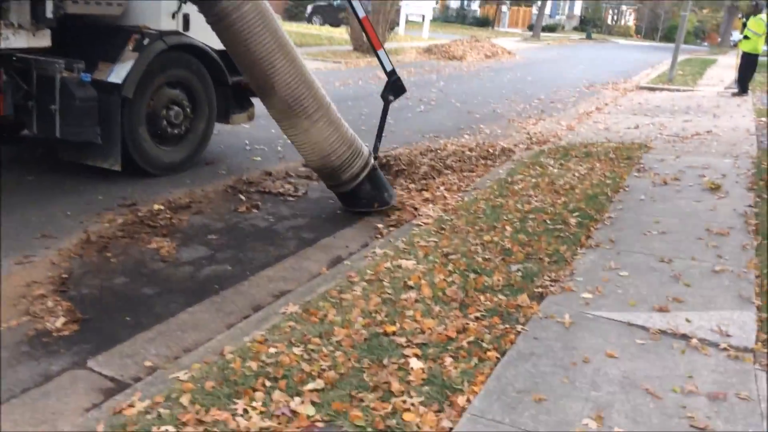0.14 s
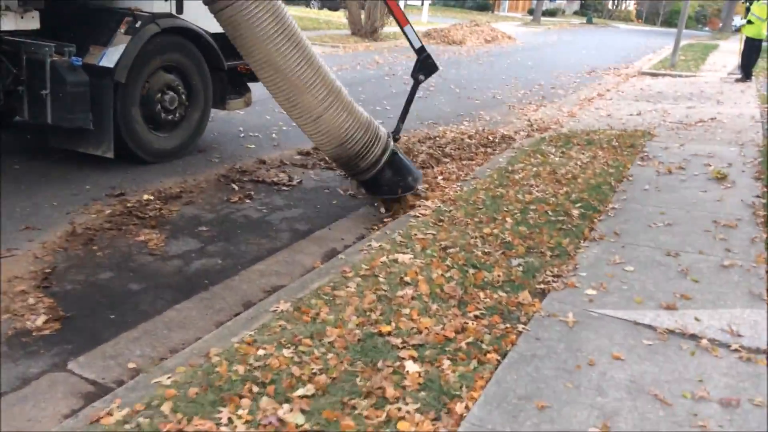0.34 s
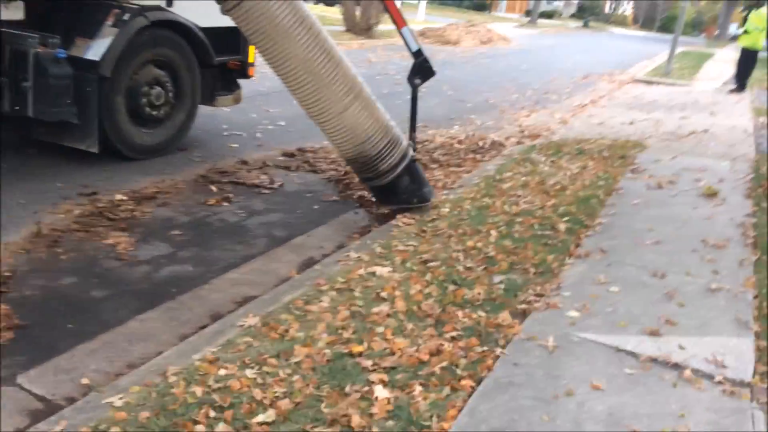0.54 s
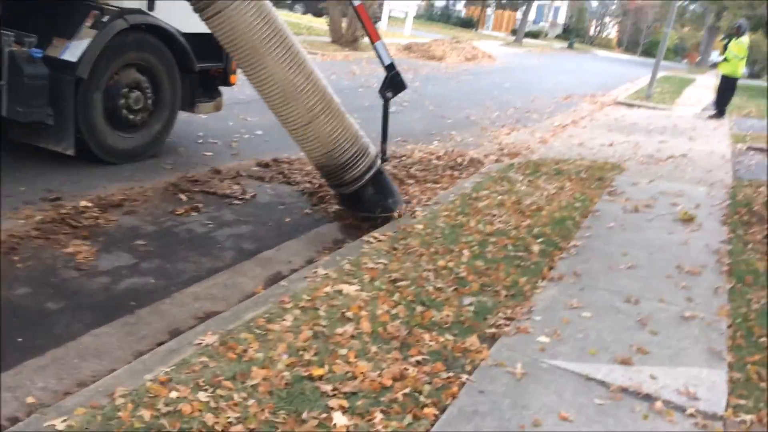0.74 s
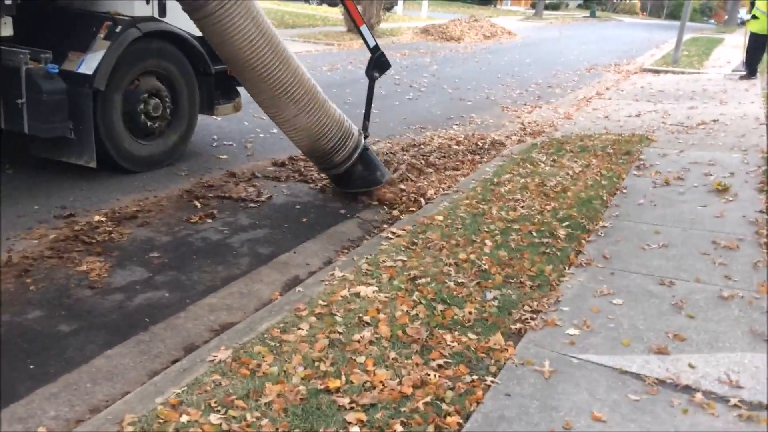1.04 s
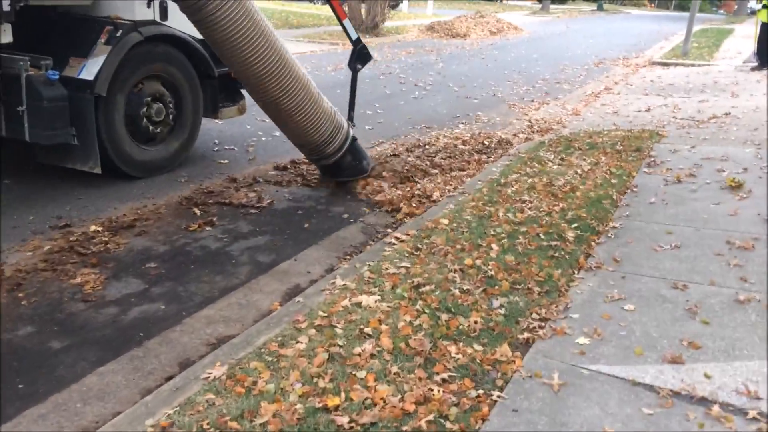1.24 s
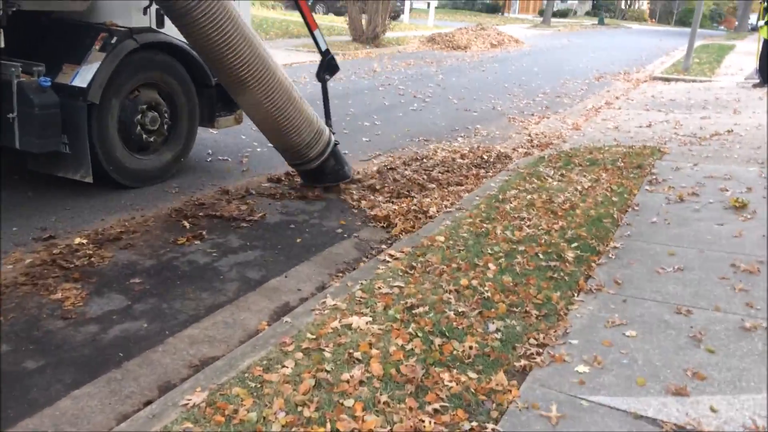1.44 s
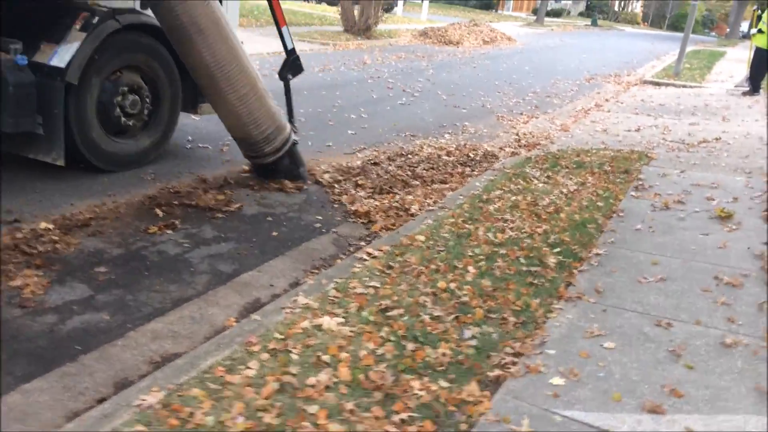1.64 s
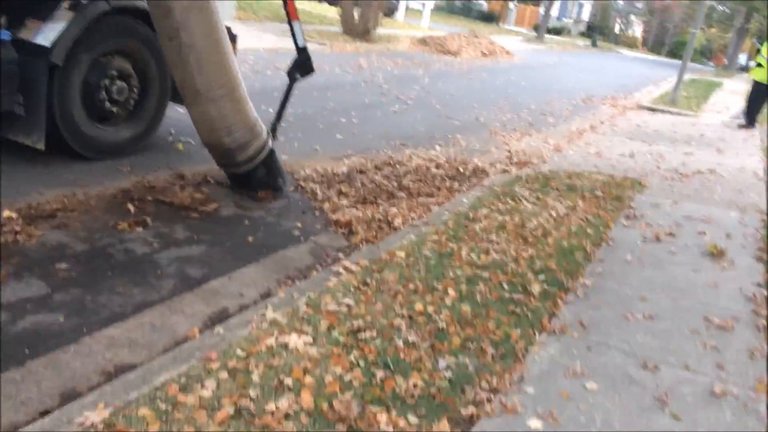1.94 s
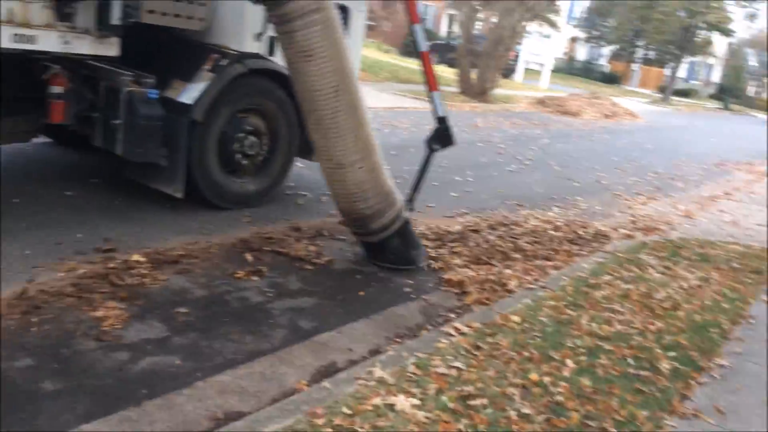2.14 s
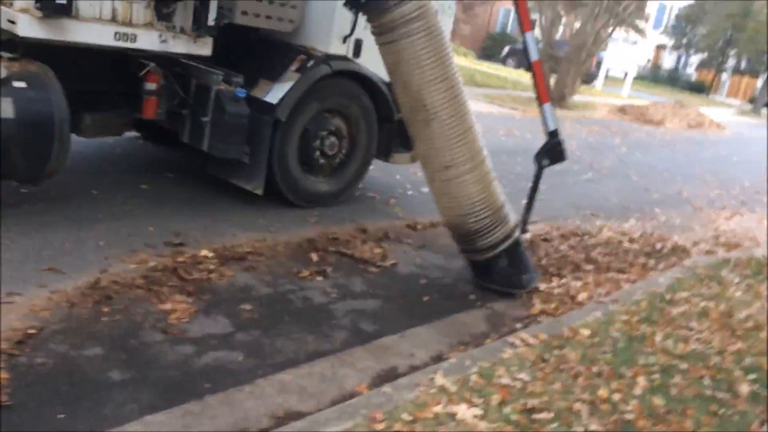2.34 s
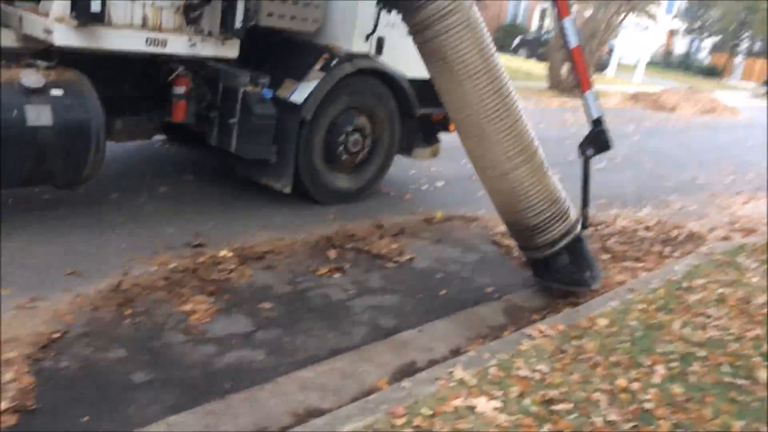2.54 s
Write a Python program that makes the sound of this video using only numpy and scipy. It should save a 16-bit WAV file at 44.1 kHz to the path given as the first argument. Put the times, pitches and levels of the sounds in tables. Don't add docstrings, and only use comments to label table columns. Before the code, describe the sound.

Heard from the pavement with one handheld microphone, a leaf-suction truck hums and roars without pause, its airflow gulping unevenly; leaves hiss up the hose, debris cracks, a high brake squeal passes, treble slightly choppy.

```python
import sys
import numpy as np
from scipy import signal
from scipy.fft import rfft, irfft
from scipy.io import wavfile
from scipy.ndimage import uniform_filter1d

SR = 44100
rng = np.random.default_rng(int(sys.argv[2]) if len(sys.argv) > 2 else 0)


def voltage_ratio(level):
    return 10 ** (np.asarray(level, float) / 20)


def to_wav(s):
    ch = np.atleast_2d(s).T
    pcm = np.round(np.clip(ch, -1, 1) * 32767)
    wavfile.write(sys.argv[1], SR, pcm.astype(np.int16))


N = 119070
TIME_S = np.arange(N) / SR
BIN_HZ = np.arange(N // 2 + 1) * SR / N

# start_s, roar_gain_db
AIR_GULP = [(0, 0.5), (.14, -1.5), (.2, 2.5), (.33, -1), (.4, -3), (.62, 1.5), (.72, -2.5), (.88, -0.5),
            (1.2, -4), (1.6, 1), (1.72, 1.5), (1.8, -1.5), (1.88, 0), (2.05, -1), (2.13, 2.5), (2.33, 0.5),
            (2.42, -1.5), (2.7, -3)]
TONE_FLUTTER_DB = 2


def level(x, db):
    return x * voltage_ratio(db) / np.sqrt(np.mean(x ** 2))


def curve(table, col):
    rows = np.array(table, float)
    return np.interp(TIME_S, rows[:, 0], rows[:, col])


def band(x, hz, width):
    return signal.lfilter(*signal.iirpeak(min(hz, .45 * SR), hz / max(width, 1), SR), x)


def walk(rate):
    hold = int(SR / rate)
    steps = np.repeat(rng.standard_normal(N // hold + 1), hold)
    return 1.42 * uniform_filter1d(uniform_filter1d(steps, hold), hold)[:N]


def colour(x, points):
    rows = np.array(points, float)
    gain_db = np.interp(np.log(np.maximum(BIN_HZ, 1)), np.log(rows[:, 0]), rows[:, 1])
    return irfft(rfft(x) * voltage_ratio(gain_db), N)


def tone(hz, db):
    return np.sqrt(2) * voltage_ratio(db) * np.sin(2 * np.pi * np.cumsum(hz) / SR)


def hum():
    # start_s, firing_hz, first_order_db, second_order_db
    engine = [(0, 62.4, -30, -36), (.2, 62.4, -30, -29), (.26, 62.7, -25, -23), (.44, 62.4, -30, -26),
              (.5, 61.9, -29, -39), (.58, 63.1, -22, -23), (.75, 62.3, -27, -29), (.9, 62.13, -26, -21),
              (1.1, 62.25, -33, -25.5), (1.3, 62.73, -24, -23), (1.4, 62.34, -31, -21.5),
              (1.66, 62.6, -28, -18.5), (1.74, 62.4, -31, -21), (1.9, 62.34, -34, -19),
              (2.3, 62.54, -29, -22.5), (2.7, 61.92, -28, -19)]
    # start_s, blade_pass_hz, level_db
    blades = [(0, 186, -21), (.14, 188.6, -12.5), (.2, 187, -22.5), (.38, 185, -26.5), (.47, 187.4, -15),
              (.52, 185.8, -20), (.63, 186.1, -12), (.78, 184.7, -17), (.9, 185.1, -12),
              (1.1, 184.9, -16.5), (1.25, 186.9, -16), (1.4, 186, -29), (1.52, 186.2, -21),
              (1.66, 186.5, -17), (1.73, 186.2, -24.5), (1.8, 187, -21), (1.9, 188.2, -24),
              (2.15, 188, -20.5), (2.26, 187.5, -25.5), (2.55, 187.3, -16), (2.7, 187.2, -23.5)]
    octave_db = -17

    def fluttering_tone(hz, db):
        return tone(hz, db + TONE_FLUTTER_DB * walk(18))

    fire_hz, blade_hz, blade_db = curve(engine, 1), curve(blades, 1), curve(blades, 2)
    firing = fluttering_tone(fire_hz, curve(engine, 2)) + fluttering_tone(2 * fire_hz, curve(engine, 3))
    throb = fluttering_tone(blade_hz, blade_db) + fluttering_tone(2 * blade_hz, blade_db + octave_db)
    return firing + throb


def hose():
    # pitch_hz, width_hz, level_db
    resonances = [(166.1, 38, -23), (212.5, 30, -33.5), (341.7, 22, -39.5), (535.6, 30, -39),
                  (1063, 240, -37), (91.4, 21, -37)]
    lump_db, gulp_share = 3, 0.16
    out = 0
    for hz, width, db in resonances:
        swell = voltage_ratio(gulp_share * curve(AIR_GULP, 1) + lump_db * walk(7))
        ringing = band(band(rng.standard_normal(N), hz, width), hz, width)
        out = out + swell * level(ringing, db)
    return out


def roar():
    # pitch_hz, density_db_per_hz
    air_colour = [(15, -41), (25, -16.5), (180, -5.5), (309, -11), (1070, -20), (2910, -25.5), (7110, -31),
                  (12900, -43.5), (16000, -65)]
    roar_db, lump_db = -21, 2.0
    out = 0
    for hz in 30 * 2. ** np.arange(0, 9.5, .5):
        gulp_share = min(hz / 250, 1)
        gain = voltage_ratio(lump_db * walk(11.93) + gulp_share * curve(AIR_GULP, 1))
        out = out + gain * band(rng.standard_normal(N), hz, hz * 0.48)
    return level(colour(out, air_colour), roar_db)


def leaves():
    # start_s, level_db
    flow = [(0, -31.5), (.14, -31), (.35, -31.5), (.55, -27.5), (.66, -27.5), (.72, -31), (.9, -33.5),
            (1.2, -31.5), (1.42, -31.5), (1.58, -37), (1.72, -32), (1.83, -34.5), (2.02, -35.5),
            (2.15, -29.5), (2.27, -35.5), (2.41, -31.5), (2.46, -27.5), (2.7, -31)]
    # pitch_hz, density_db_per_hz
    leaf_colour = [(500, 4.5), (1500, 2.5), (2600, -4), (4000, -7.5), (6500, -3.5), (10000, -7),
                   (14000, -9), (15800, -10)]
    leaf_db, hiss = 7, 1
    grains_per_s, spread_db, tail_s = 2500, 3, 0.0025
    chance = rng.random((2, N))
    grain_sizes = voltage_ratio(-spread_db * np.log(chance[1] + 1e-9))
    clicks = (chance[0] < grains_per_s / SR) * grain_sizes
    tails = np.sqrt(signal.lfilter([1], [1, -np.exp(-1 / (tail_s * SR))], clicks ** 2))
    rustle = (level(tails, 0) + hiss) * rng.standard_normal(N)
    return level(colour(rustle, leaf_colour), leaf_db) * voltage_ratio(curve(flow, 1))


def whistles():
    # start_s, length_s, pitch_hz, glide_hz_per_s, level_db
    lodged_leaves = [(0.177, .11, 2040, -300, -33), (0.198, .075, 530, 200, -27),
                     (0.295, 0.036, 743, 0, -29), (0.299, 0.1, 1760, -1500, -35),
                     (.585, 0.036, 2300, 0, -33), (.59, 0.075, 1580, 0, -28.5),
                     (0.915, 0.12, 340.1, 100, -26.5), (2.105, 0.037, 421.5, 300, -23),
                     (2.2, 0.039, 469.7, -300, -26), (2.32, .04, 753, 800, -26.5),
                     (2.429, .06, 454, 0, -36)]
    waver = 1 + .006 * walk(60.3)
    flutter = TONE_FLUTTER_DB * walk(49.9)
    out = 0
    for start, length, hz, glide, db in lodged_leaves:
        part = np.clip((TIME_S - start) / length, 0, 1)
        pitch = (hz + glide * part * length) * waver
        out = out + np.sin(np.pi * part) * tone(pitch, db + flutter)
    return out


def hits():
    # start_s, level_db, crack_hz, ring_hz, decay_s
    knocks = [(.189, -25, 3018, 2000, 0.013), (0.44, -17.5, 8400, 8200, 0.0055),
              (.598, -15, 4500, 6600, 0.013), (0.642, -14, 6500, 6900, 0.006),
              (0.65, -11.5, 6500, 4300, 0.0047), (0.655, -10, 7000, 5600, 0.005),
              (1.317, -11.5, 4940, 6590, 0.006), (1.699, -17, 3000, 1500, 0.01),
              (1.71, -15, 1600, 1453, 0.012), (1.727, -17, 2000, 4740, 0.008),
              (1.72, -9, 4486, 4793, 0.0056), (1.722, -14, 3400, 3530, 0.005),
              (1.801, -10.5, 6800, 6580, 0.0047), (1.803, -12, 4933, 4260, 0.0036),
              (1.853, -18, 4397, 4122, 0.011), (1.885, -23, 4994, 2213, 0.018),
              (1.950, -7, 3614, 3304, 0.0036), (1.951, -16, 6464, 6890, 0.0032),
              (1.956, -15, 5140, 5323, 0.0047), (2.045, -19, 7920, 3396, 0.0063),
              (2.109, -18, 2998, 2525, 0.011), (2.359, -18, 8960, 6465, 0.0086),
              (2.421, -8.5, 10510, 10550, 0.007), (2.425, -11.5, 5986, 4610, 0.0062),
              (2.49, -16.5, 6000, 4162, 0.014), (2.539, -22, 4106, 4105, 0.0049)]
    hit_db, ring_db = -6, -5
    rise_s, relative_width = .001, 1.3
    noise = rng.standard_normal(N)
    out = 0
    for start, db, hz, ring_hz, decay in knocks:
        age = np.maximum(TIME_S - start, 0)
        shape = (1 - np.exp(-age / rise_s)) * np.exp(-age / max(decay, .002))
        width = relative_width * hz
        crack = level(band(band(noise, hz, width), hz, width), 0)
        ring = tone(np.full(N, ring_hz), ring_db)
        out = out + shape * voltage_ratio(db + hit_db) * (crack + ring)
    return out


def squeal():
    # start_s, pitch_hz, level_db
    main_voices = [
        [(1.025, 6640, -42), (1.055, 6620, -26), (1.075, 6630, -29), (1.09, 6675, -30), (1.108, 6600, -30),
         (1.135, 6630, -45)],
        [(1.14, 6570, -37), (1.16, 6543, -22.5), (1.194, 6572, -17), (1.235, 6580, -24), (1.285, 6580, -33),
         (1.38, 6586, -22.5), (1.44, 6576, -20), (1.52, 6570, -28), (1.63, 6580, -42)],
    ]
    # start_s, pitch_hz, level_db
    upper_voice = [(1.29, 6715, -36), (1.335, 6700, -33), (1.37, 6730, -28), (1.41, 6670, -27),
                   (1.44, 6650, -40)]
    # start_s, pitch_hz, level_db
    high_voices = [
        [(1.0, 7290, -43), (1.04, 7270, -38), (1.08, 7270, -33), (1.1, 7365, -36), (1.12, 7300, -40)],
        [(1.275, 7440, -42), (1.32, 7495, -36), (1.35, 7455, -37), (1.415, 7435, -33), (1.445, 7365, -32),
         (1.492, 7356, -31), (1.532, 7360, -34), (1.565, 7356, -32), (1.595, 7370, -40)],
        [(1.62, 7520, -40), (1.655, 7410, -34), (1.67, 7420, -34), (1.688, 7425, -28), (1.72, 7320, -36)],
    ]
    flutter_db, fade_s, octave_db = 2, 0.01, -21
    out = 0
    for voice in [*main_voices, upper_voice, *high_voices]:
        nearest_end = np.minimum(TIME_S - voice[0][0], voice[-1][0] - TIME_S)
        gate = np.clip(nearest_end / fade_s, 0, 1)
        hz = curve(voice, 1)
        db = curve(voice, 2) + flutter_db * walk(59.5)
        out = out + gate * (tone(hz, db) + tone(2 * hz, db + octave_db))
    return out


def sparse(x):
    from_hz, top_hz, top_share = 10000, 15800, 1.3
    hz, _, cells = signal.stft(x, SR, nperseg=2048)
    power = np.abs(cells) ** 2
    around = uniform_filter1d(power, size=32, axis=0)
    share = top_share * np.clip((hz - from_hz) / (top_hz - from_hz), 0, 1)
    kept = cells * (power > share[:, None] * around)
    return signal.istft(kept, SR, nperseg=2048)[1][:N]


def starve(x):
    # centre_s, lowest_lost_hz
    dropouts = [
        (.023, 1300),
        (0.128, 900),
        (0.769, 1227),
        (0.875, 602),
        (1.005, 3140),
        (1.578, 1905),
        (2.070, 3520),
        (2.282, 1518),
    ]
    survivors = [
        [1900, 2700, 4500, 5400, 6900, 10700],
        [1300, 1900, 2500, 3200, 4800, 6700, 8000, 10800],
        [2400, 4400, 5400, 6100, 8000, 9800],
        [1100, 2300, 3400, 5600, 6700, 7600],
        [5500, 7300, 8800],
        [3400, 6590],
        [6100, 7000],
        [2400, 3500],
    ]
    # start_s, length_s, centre_hz, width_hz
    holes = [(1.815, .045, 13550, 350), (1.88, .045, 13900, 450), (1.82, .05, 14650, 250),
             (1.97, .185, 14800, 560), (2.175, .03, 14100, 500), (1.855, .025, 15600, 800),
             (1.88, .085, 15850, 300), (2.07, .03, 15850, 300), (2.18, .03, 15600, 700),
             (2.21, .05, 15850, 300), (2.32, .02, 15300, 450), (2.09, .06, 15450, 150),
             (2.385, .03, 15850, 300), (2.46, .025, 15850, 400), (2.62, .025, 15700, 550),
             (2.645, .055, 15850, 300), (1.94, .3, 15080, 120)]
    drop_s, survivor_width_hz, drop_top_hz = .032, 200, 15000
    drop_share, survivor_gain, flatness = .93, 0.94, 1.03
    spectrum, lost = rfft(x), 0
    for (centre_s, low_hz), kept in zip(dropouts, survivors):
        gone = np.abs(BIN_HZ[:, None] - kept).min(axis=1) > survivor_width_hz / 2
        in_range = (BIN_HZ > low_hz) * (BIN_HZ < drop_top_hz)
        mask = in_range * np.where(gone, drop_share, -survivor_gain)
        phase = np.pi * np.clip((TIME_S - centre_s) / drop_s, -.5, .5)
        window = np.minimum(flatness * np.cos(phase) ** 2, 1)
        lost = lost + window * irfft(spectrum * mask, N)
    x = x - lost
    for start, length, centre_hz, width in holes:
        nearest_end = np.minimum(TIME_S - start, start + length - TIME_S)
        window = np.clip(nearest_end / .012 + 1, 0, 1)
        x = x - window * irfft(rfft(x) * (np.abs(BIN_HZ - centre_hz) < width / 2), N)
    return x


def split(x):
    # centre_s, low_hz, high_hz
    smears = [
        (.922, 5700, 6900),
        (.968, 6900, 8300),
        (1.525, 10400, 11800),
        (1.665, 5200, 6300),
        (1.665, 11800, 13800),
        (2.13, 9000, 10400),
        (2.5, 7600, 9000),
    ]
    side_db, length_s = -1, .017
    scrambled = rfft(np.roll(x, 4000))
    side = 0
    for centre_s, low_hz, high_hz in smears:
        window = np.clip(1.5 - np.abs(TIME_S - centre_s) / length_s * 1.5, 0, 1)
        side = side + window * irfft(scrambled * (BIN_HZ > low_hz) * (BIN_HZ < high_hz), N)
    return voltage_ratio(side_db) * side


def scene():
    mono = hum() + hose() + roar() + leaves() + whistles() + hits() + squeal()
    return np.array([mono, mono])


def roll_off(x):
    return signal.sosfilt(signal.butter(12, 15800, fs=SR, output="sos"), x)


def record(dry):
    drive = 0.33
    limited = np.tanh(drive * dry[0]) / drive
    mono = starve(sparse(limited))
    top_cut = signal.ellip(10, .3, 60, 15720, fs=SR, output="sos")
    mono = signal.sosfilt(top_cut, mono)
    side = split(mono)
    return roll_off(np.array([mono + side, mono - side]))


dry = scene()
out = record(dry)
to_wav(out)
```